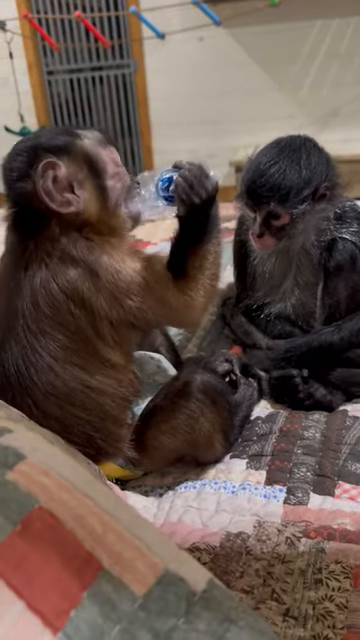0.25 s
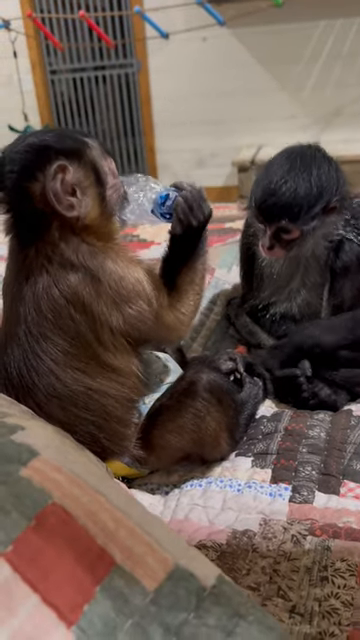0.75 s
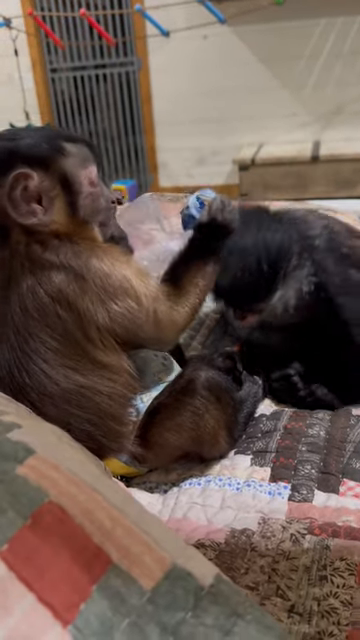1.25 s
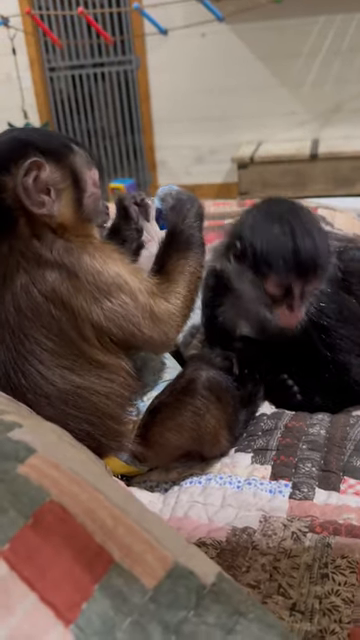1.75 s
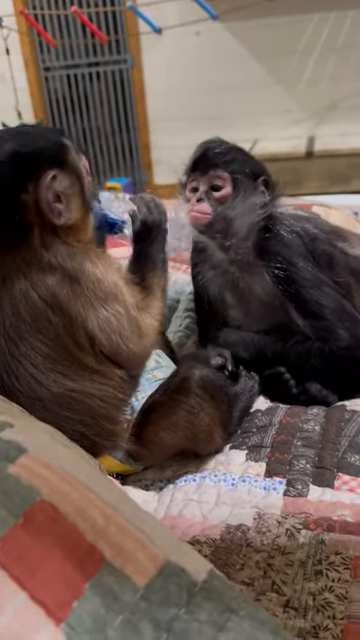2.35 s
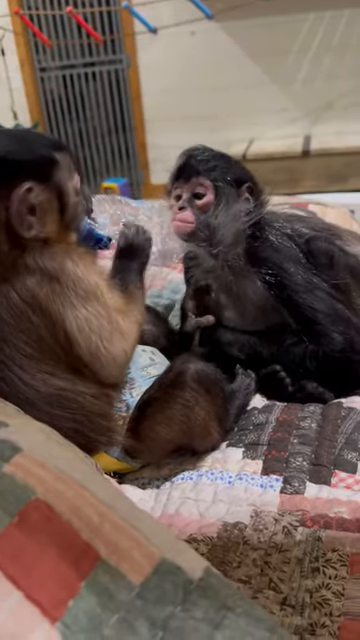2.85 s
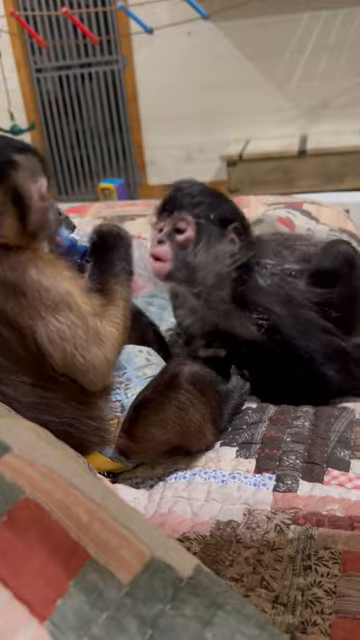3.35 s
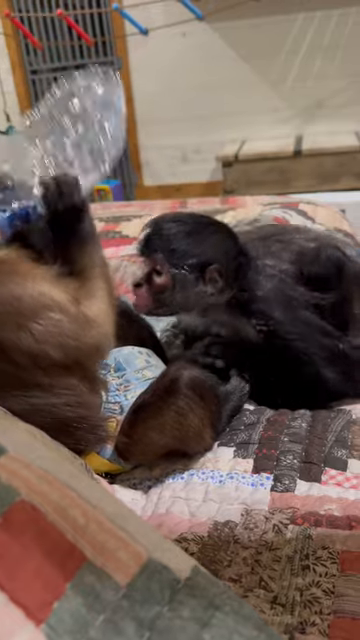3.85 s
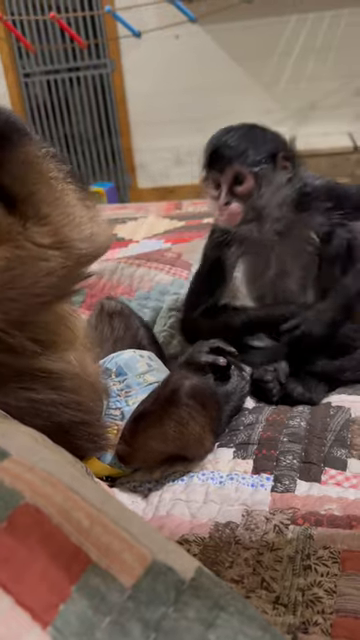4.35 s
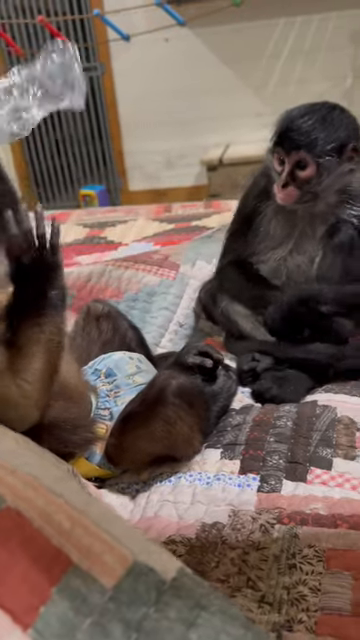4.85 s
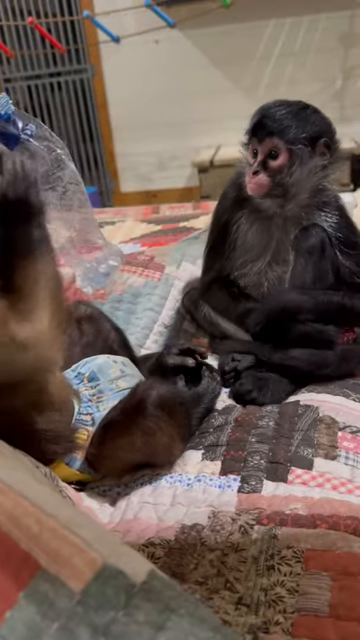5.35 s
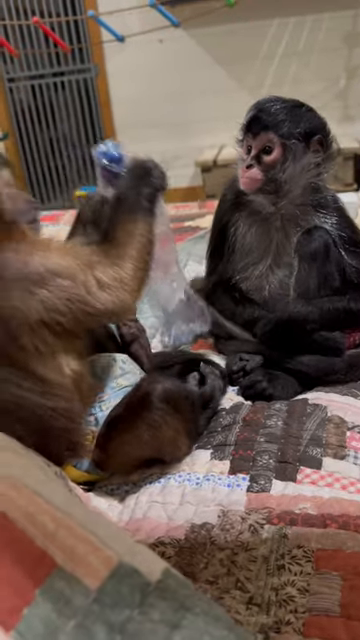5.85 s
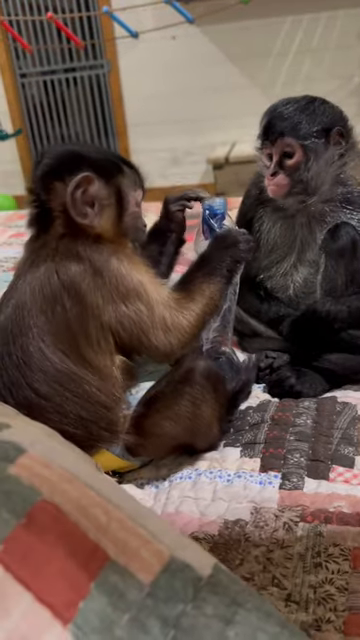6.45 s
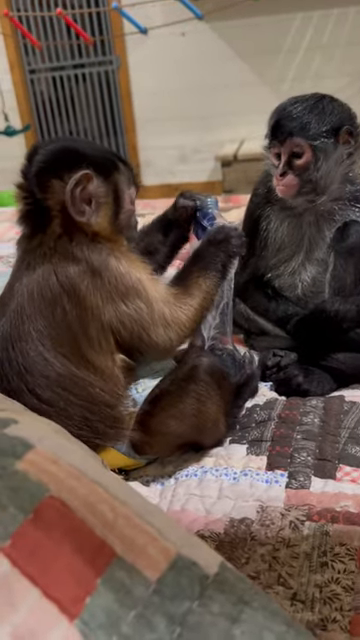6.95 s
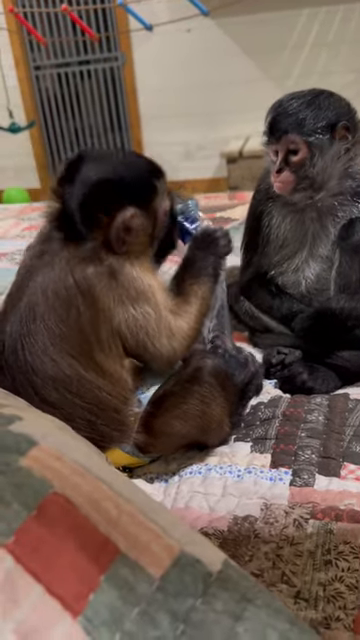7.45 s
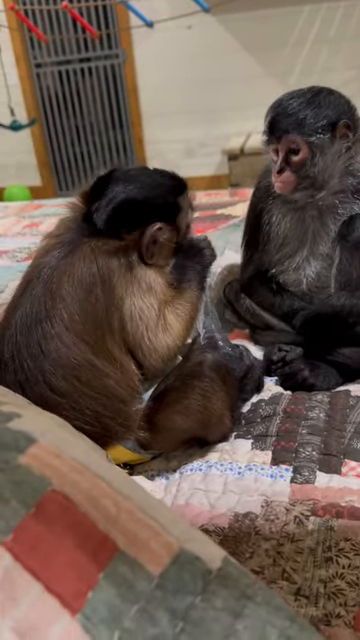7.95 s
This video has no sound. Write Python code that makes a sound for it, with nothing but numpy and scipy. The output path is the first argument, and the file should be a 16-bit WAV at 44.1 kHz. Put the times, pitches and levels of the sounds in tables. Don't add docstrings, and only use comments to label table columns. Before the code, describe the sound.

Indoor handheld capture about a metre away: irregular plastic cracks come first, loud and dry with a short bright echo. A soft paw thud on bedding follows, then scattered light crinkling and brief stick-slip creaks. Young monkeys give faint high chirps and barely audible coos. Squeezing and nail-like ticks continue quietly, then sudden crisp crunches close the scene, with faint rumbling air underneath throughout.

```python
import sys
import numpy as np
from scipy import signal
from scipy.fft import rfft, irfft, next_fast_len
from scipy.io import wavfile
from scipy.ndimage import uniform_filter1d

SR = 44100
rng = np.random.default_rng(int(sys.argv[2]) if len(sys.argv) > 2 else 0)


def dump(signal):
    limited = np.clip(np.atleast_2d(signal).T, -1, 1)
    pcm = np.round(limited * 32767).astype(np.int16)
    wavfile.write(sys.argv[1], SR, pcm)


def gain_from_db(level_db):
    decades = np.asarray(level_db, float) / 20
    return 10 ** decades


N = 361179
GRAIN = 1024

# (frequency [Hz], width [Hz], level [dB])
BELLY = [(144, 580, -2), (330, 130, 4), (550, 130, 0), (925, 130, 4.5)]
PANEL = [(1178, 190, 3), (1716, 160, 0.5), (2070, 240, 1.5), (2920, 440, -5.5)]
RIB = [(3830, 440, 1), (5220, 1400, -3), (6200, 460, 1.5), (6580, 410, -13.5)]
EDGE = [(8520, 1300, 8.5), (11200, 860, -10), (14400, 2200, -1.5), (17200, 1000, -5.5)]


def along(table, hz):
    points = np.array(table)
    return np.interp(np.log(np.maximum(hz, 1)), np.log(np.maximum(points[:, 0], 1)), points[:, 1])


def shaped(x, response):
    size = next_fast_len(x.shape[-1] + 8192)
    spectrum = rfft(x, size) * response(np.fft.rfftfreq(size, 1 / SR))
    return irfft(spectrum, size)[..., :x.shape[-1]]


def unit(x):
    return x / np.sqrt(np.mean(x ** 2))


def walk(rate):
    hold = int(SR / rate)
    steps = np.repeat(rng.standard_normal(N // hold + 1), hold)
    return 1.2 * uniform_filter1d(steps, hold)[:N]


def ring(hz, centre_hz, width_hz):
    return 1j * hz * width_hz / (centre_hz ** 2 - hz ** 2 + 1j * hz * width_hz)


def add(track, at_s, grains):
    for s, grain in zip(at_s, grains):
        i = max(int(s * SR), 0)
        track[i:i + len(grain)] += grain[:N - i]


def buckles(part_db, burst_s, after, sweep, detune, scatter_db, damping, polarity=-1):
    t, hz = np.arange(GRAIN) / SR, np.fft.rfftfreq(GRAIN, 1 / SR)
    decay = np.exp(-t / burst_s) + after * np.exp(-t / (3.1 * burst_s))
    slips = rng.standard_normal((len(part_db), GRAIN)) ** 3 * np.minimum(t / 0.00018 + 0.35, 1) * decay
    slips[:, 0] += 1.9 * np.sqrt(np.sum(slips ** 2, axis=1))
    tune = rng.standard_normal((len(part_db), 4, 4, 2))
    drive = rfft(slips) * np.exp(-2j * np.pi * sweep * np.log(1 + hz / 300))
    out = 0
    for p, modes in enumerate((BELLY, PANEL, RIB, EDGE)):
        wall = 0
        for m, (mode_hz, width_hz, db) in enumerate(modes):
            tuned_hz = mode_hz * (1 + detune * tune[:, p, m, :1])
            gain = polarity ** m * gain_from_db(db + scatter_db * tune[:, p, m, 1:])
            wall = wall + gain * ring(hz, tuned_hz, damping * width_hz)
        wall = wall * ring(hz, modes[2][0], 1.29 * modes[2][0])
        if polarity > 0:
            delay_s = .002 + .003 * np.abs(tune[:, 0, 0, :1])
            wall = np.abs(wall) * np.exp(-2j * np.pi * hz * delay_s)
        part = irfft(drive * wall)
        out = out + part * gain_from_db(part_db[:, p:p + 1]) / np.sqrt(np.sum(part ** 2, axis=1, keepdims=True))
    return out


def snaps(crease_db, burst_s, **manner):
    # (time [s], energy [dB], sharpness [dB], crease pitch [Hz])
    bites = [(.010, -21.5, 4.5, 6200), (.025, -22.5, 9, 6360), (.0651, -5.5, 6.5, 2450),
             (.2211, -6, 6.5, 2432), (.3781, -17.5, -4, 1840), (.3936, -21.5, -2, 1797),
             (.4406, -5.5, -1, 2430), (.4564, -1.5, 8.5, 6400), (.4702, 0.5, 0, 2075),
             (.4795, -12, -13, 2100), (.482, -5, -3.5, 6000), (.6904, -12, 7.5, 2346),
             (.6991, -19.5, 4.5, 6940), (.7301, -13, -6.5, 2554), (.8626, -11.5, 4, 2399),
             (.903, -0.5, -2, 2175), (.909, 1, 4, 1916), (.9322, 2, 1.5, 5600), (1.1753, -24.5, -15, 1940),
             (7.7721, -10, 6, 2200), (7.7846, -24.5, 5.5, 4000), (7.798, 1.5, 4, 5898),
             (7.8955, -17.5, -46, 1890), (7.907, -21.5, -2.5, 1480), (7.963, -25, -1, 1870),
             (8.0585, -38, 6.5, 6000), (8.0662, -19, -19, 1900), (8.1082, 5, -0.5, 1829),
             (.937, -9.5, -6.5, 1790), (.409, -32.5, 1.5, 5000), (.4572, -7, -7.5, 2200),
             (.9328, -4, -8.5, 1900), (.9235, -18, 2.5, 4200), (.0655, -12, 4.5, 5800),
             (.4706, -7, 5.5, 5900), (7.762, -35, 4.5, 3500), (8.0765, -48.5, 12, 8800),
             (7.8105, -20, 1, 5770), (7.833, -21, 4.5, 6010), (8.1086, -0.5, 4.5, 3540),
             (.2215, -8, 5.5, 6190), (7.7985, -9, 2, 2976)]
    flips = [(3.511, -44, -8.5, 2500), (4.192, -52, -3.5, 4960), (4.411, -62.5, 9.5, 6110),
             (4.9983, -49.5, -3, 4960), (6.9224, -36, 5.5, 2600), (7.2349, -49.5, 4.5, 3370),
             (7.292, -41, -8, 6180)]
    dents = [(0.228, -13, -10, 893), (1.593, -48, -3.5, 702), (1.823, -48, -8.5, 691),
             (2.5761, -31.5, -19.5, 322.6), (2.811, -28.5, -12.5, 330), (7.003, -35.5, -7, 700),
             (.229, -21, -24, 286), (3.734, -33.5, -40, 330), (3.8852, -32, -10, 598),
             (4.5523, -13.5, -27.5, 1200), (5.998, -31, -7, 540), (7.73, -35.5, -40, 493),
             (8.031, -30.5, 1, 596), (8.11, -9.5, -9, 597), (0.466, -7.5, -20, 920),
             (4.553, -17.5, -20, 471), (0.749, -33.5, -21, 697.6), (6.081, -40, -35, 1480),
             (6.129, -32.5, -29, 1450), (6.283, -30, -20.5, 586), (6.359, -28, -17, 2504),
             (8.1083, -1.5, -8, 1158), (0.913, -12.5, -10, 870), (.962, -21, -7, 790), (.977, -22, -5, 790),
             (7.801, -18, -1, 513)]
    turning = [(1.2823, -29.5, -13, 2515), (1.4017, -37.5, -4, 4420), (1.483, -44.5, -11.5, 2307),
               (1.5782, -32.5, -3, 2450), (1.921, -50, 15.5, 4380), (1.94, -28, -18, 1766),
               (2.2073, -21, -10, 2240), (2.2122, -26, -19, 1575), (2.24, -27.5, -21, 2212),
               (2.2453, -25, -16.5, 2175), (2.8089, -19.5, -13, 1120), (2.836, -27, -16, 2160),
               (2.844, -26.5, -8.5, 1950), (2.8483, -30, -17.5, 1980), (2.8689, -32.5, -7.5, 2070),
               (2.8731, -32, -11, 1680), (2.916, -32, -29, 1620), (3.023, -33.5, -7.5, 2370),
               (3.0336, -44, -7, 2340), (3.1417, -29, -8, 2330), (3.163, -29.5, -13.5, 3190),
               (3.1922, -31.5, -17, 1850), (3.2038, -32, -13, 3170), (3.259, -24.5, -8.5, 2250),
               (3.2632, -26, -12, 1560), (3.2668, -29, -21.5, 1680), (3.2758, -31.5, -10, 2890),
               (3.2849, -25.5, -16.5, 1640), (3.3, -27, -17, 1800), (3.3081, -29, -21.5, 1700),
               (3.314, -23.5, -28, 1750), (3.3179, -35, -27, 1710), (3.3228, -26, -10, 1680),
               (3.3283, -28, -28.5, 1130), (3.413, -28.5, -21.5, 1120), (3.4426, -28.5, -25, 1138),
               (3.4486, -32, -26, 1700), (3.5284, -39.5, -11.5, 1150), (3.5615, -19.5, -17, 2110),
               (3.637, -24, -15.5, 2540)]
    lifting = [(3.8131, -35, -15.5, 1116), (3.83, -32.5, -16.5, 1130), (3.91, -18.5, -11, 1920),
               (3.9308, -25.5, -9.5, 1910), (3.96, -22.5, -20, 1090), (4.07, -29.5, -23, 1140),
               (4.077, -27, -23, 1725), (4.089, -20.5, -9.5, 1770), (4.1071, -51, -6.5, 2280),
               (4.217, -35, -14.5, 1644), (4.231, -27, -20.5, 2160), (4.3285, -46.5, -15, 1970),
               (4.4869, -26.5, -16.5, 1700), (4.4959, -33.5, -9, 950), (4.5215, -34, -13, 774),
               (4.532, -26, -10, 2270), (4.5568, -27.5, 1.5, 734), (4.7213, -33, -3.5, 1700),
               (4.8045, -39.5, -6, 1720), (5.38, -48, -13, 2110), (5.3997, -44, -15.5, 2925),
               (5.5234, -40.5, -15, 2170), (5.5252, -35, -29, 950)]
    squeezing = [(5.9072, -31, 1.5, 2630), (5.9669, -28, -7.5, 1800), (6.0165, -25, 0, 1130),
                 (6.0328, -24.5, -10, 1050), (6.2087, -20, -11.5, 1140), (6.255, -27.5, -27.5, 1145),
                 (6.291, -29, -12.5, 1254), (6.3537, -24, -9.5, 1860), (6.376, -29.5, -20, 1220),
                 (6.387, -35, -9, 3140), (6.4706, -37.5, -17.5, 1340), (6.4775, -41, -18, 1940),
                 (6.56, -42.5, -18, 1850), (6.585, -39.5, -9.5, 1770), (6.5923, -33, -32.5, 1240),
                 (6.6104, -34, -11, 2200), (6.665, -30.5, -12, 1980), (6.71, -28, -5, 2020),
                 (6.8094, -28.5, 1, 1980), (6.8183, -36, 8, 6660), (6.824, -34.5, 3.5, 1870),
                 (6.84, -37.5, 5.5, 4050), (6.859, -42.5, 3.5, 3080), (6.8903, -29, -0.5, 2170),
                 (6.906, -34.5, -2, 2136), (6.9998, -35.5, -8, 3600), (7.1577, -49, -7, 2670),
                 (7.4201, -33, -9, 1840), (7.448, -30.5, -11.5, 1850), (7.4564, -31.5, -15, 1846),
                 (7.461, -33.5, -11.5, 1800), (7.4668, -44.5, -16, 1820), (7.4694, -36.5, -20, 804),
                 (7.4757, -37, -11, 1920), (7.4804, -34.5, -13.5, 1077), (7.5026, -37, -15.5, 1760),
                 (7.5107, -35, -22.5, 1040), (7.516, -31, -19, 1810), (7.5546, -31.5, -7, 2000),
                 (7.561, -32.5, -1, 1770), (7.5785, -31.5, -1.5, 1160), (7.5905, -27, -10, 1960),
                 (7.5943, -27.5, -18, 1940), (7.742, -31.5, -19.5, 1120)]
    ticking = [(1.3298, -41, -2.5, 2255), (1.5553, -36, -1, 2280), (1.7023, -45.5, 8, 3740),
               (1.8564, -41.5, 0, 6130), (2.4319, -47, 0, 3263), (6.5877, -41, 0.5, 7900),
               (6.6016, -36, -3, 5300), (6.6228, -27, -1.5, 6520), (6.631, -34.5, -1, 5200),
               (6.6389, -24, -1.5, 3080), (6.6874, -42, 2, 6780), (6.744, -45.5, 3.5, 5770),
               (6.7655, -40, 5.5, 6760), (6.7792, -31, 5.5, 7900), (6.7931, -28, 9.5, 6860),
               (6.799, -25, -4.5, 7770), (6.9159, -33.5, 2, 2520), (7.0347, -39, -2.5, 5750),
               (7.0978, -42.5, 0, 2390), (7.228, -56.5, -6.5, 1567)]
    # (belly [dB], panel [dB], rib [dB], edge [dB])
    share_db = [(-14, 0.0035, 0, -2.5), (-12, 0.0038, 5, 7), (-2, 0.0044, 2, -2), (-11, 0.0039, -0.5, -9.5),
                (-7.5, 0.001, 2.5, 2), (-4, 0.03, -2, -0.5), (-8, 0.0085, -1, 4)]
    stands_out_db = (6, 18, 11, 4, 4, 4, 7)
    # (belly [dB/dB], panel [dB/dB], rib [dB/dB], edge [dB/dB])
    sharpness_gain = (-0.15, 0.064, 0.88, 1.3)

    kinds = bites, flips, dents, turning, lifting, squeezing, ticking
    rows, counts = np.vstack(kinds), [len(k) for k in kinds]
    sharp_db, crease_hz = rows[:, 2:3], rows[:, 3:]
    part_db = rows[:, 1:2] + np.repeat(share_db, counts, axis=0) + sharp_db * np.array(sharpness_gain)
    lasting_s = burst_s * gain_from_db(-0.1 * np.clip(sharp_db, -15, 15))
    wall = buckles(part_db, lasting_s, **manner)
    boost = gain_from_db(crease_db + np.repeat(stands_out_db, counts))[:, None]
    crease = ring(np.fft.rfftfreq(GRAIN, 1 / SR), crease_hz, 0.3 * crease_hz)
    rung = irfft(rfft(wall) * (1 + boost * crease))
    same_energy = np.sqrt(np.sum(wall ** 2, axis=1) / np.sum(rung ** 2, axis=1))
    track = np.zeros(N)
    add(track, rows[:, 0], rung * same_energy[:, None])
    return track


def creaks():
    # (time [s], length [s], slip rate [1/s], crease pitch [Hz], level [dB])
    trains = [(0.372, .04, 260, 1570, -42), (2.818, .03, 560, 700, -63.5), (2.853, 0.044, 320, 1630, -52),
              (3.113, .028, 500, 1474, -55.5), (3.291, .045, 470, 2720, -64.5),
              (5.522, .03, 300, 1096, -59), (5.584, .092, 500, 1474, -71.5),
              (6.555, 0.055, 760, 1400, -57.5), (6.652, .044, 660, 1980, -85),
              (7.546, .046, 900, 1500, -61.5), (7.613, 0.028, 410, 1246, -44.5),
              (7.652, 0.026, 400, 1210, -50.5), (7.663, .011, 420, 2100, -54),
              (7.677, .014, 400, 1250, -57.5), (7.961, 0.026, 300, 1950, -48.5),
              (8.03, .031, 400, 1300, -46.5)]
    track, hz = np.zeros(N), np.fft.rfftfreq(GRAIN, 1 / SR)
    unevenness = np.where(np.array(trains)[:, 2] > 430, .45, .07)
    part_db = np.array([-8.5, -4.0, -16, -39.5]) + unevenness[:, None] * np.array([-1.0, 0.0, 7, 34])
    creases = buckles(part_db, .00008, after=0, sweep=0.88, detune=0.056, scatter_db=0.86, damping=1.2)
    for (s, length, rate, crease_hz, db), uneven, crease in zip(trains, unevenness, creases):
        chance = rng.standard_normal((80, 2))
        at = np.cumsum(np.exp(uneven * chance[:, 0]) / rate) - 1 / rate
        keep = at < length
        peak = ring(hz, crease_hz, (0.33 + 0.46 * uneven) * crease_hz)
        second_peak = 1.3 * ring(hz, 1.7 * crease_hz, 0.4 * crease_hz)
        tuned = irfft(rfft(crease) * (0.62 * uneven + 0.5 + peak - second_peak))
        add(track, s + at[keep], gain_from_db(db + 21 + 7.0 * uneven * chance[keep, 1:]) * tuned)
    return track


def rustle():
    # (time [s], effort [dB])
    efforts = [(0.0, -44), (0.092, -50), (0.981, -49), (1.39, -62), (2.03, -77.5), (2.779, -69),
               (3.17, -61), (5.36, -81), (5.91, -70.5), (6.16, -57.5), (6.41, -88.5), (6.59, -61),
               (6.77, -60.5), (7.21, -75.5), (7.46, -92), (7.639, -76), (8.01, -53.5), (8.19, -64)]
    s, effort_db = np.transpose(efforts)
    bright_db = effort_db - 9.5 + 0.75 * (effort_db + 52)
    levels = effort_db, effort_db, bright_db
    out = 0
    for modes, level_db, trim_db in zip((BELLY[2:], PANEL, RIB), levels, (-15, -8, -7)):
        hits = rng.random(N) < 5000 / SR
        size = gain_from_db(2.7 * np.minimum(rng.exponential(size=N), 5))
        ticks = hits * rng.standard_normal(N) * size
        body = shaped(ticks, lambda hz: sum(gain_from_db(db) * ring(hz, f, 2.5 * w) for f, w, db in modes))
        effort = np.interp(np.arange(N) / SR, s, level_db)
        out = out + unit(body) * gain_from_db(effort + trim_db + 2.5 * walk(40))
    return out


def shivers():
    # (time [s], rise [s], T60 [s], facet pitch [Hz], level [dB])
    facets = [(.001, .001, .05, 420, -37), (.125, .02, 0.087, 2060, -42),
              (0.796, 0.028, 0.068, 2500, -45.5), (.955, .012, .2, 950, -42), (2.579, 0.0055, .1, 330, -60),
              (2.585, .01, 0.17, 902, -68.5), (2.815, 0.0044, 0.11, 330, -54.5),
              (4.565, .01, 0.73, 1140, -60)]
    track, t, hz = np.zeros(N), np.arange(SR // 2) / SR, np.fft.rfftfreq(SR // 2, 1 / SR)
    for s, rise, t60, facet_hz, db in facets:
        facet = ring(hz, facet_hz, 0.3 * facet_hz) ** 2
        flutter = irfft(rfft(rng.standard_normal(len(t))) * facet)
        fade = gain_from_db(db - 60 * np.maximum(t - rise, 0) / t60)
        add(track, [s], [unit(flutter) * np.minimum(t / rise, 1) * fade])
    return track


def arc(rows, fall, bend, ends_db, octave_db, octave_ends_db):
    u, notes = np.linspace(0, 1, num=9), []
    for s, length, hz, db, top in rows:
        away = np.where(u < top, (top - u) / max(top, 1e-9), (u - top) / (1 - top))
        off = np.abs(2 * u - 1)
        pitch_hz = hz * (1 - fall * away ** bend)
        level_db = db + ends_db * away ** 2
        notes.append(np.transpose([s + length * u, pitch_hz, level_db, db + octave_db + octave_ends_db * off]))
    return notes


def voice(notes, edge_s, wobble, half_db):
    track, tremor = np.zeros(N), walk(65)
    for note, sub_db in zip(notes, half_db):
        s, *columns = np.transpose(note)
        i = int(s[0] * SR)
        t = s[0] + np.arange(int((s[-1] - s[0]) * SR)) / SR
        hz, db, octave_db = (np.interp(t, s, c) for c in columns)
        turn = 2 * np.pi * np.cumsum(hz * (1 + wobble * tremor[i:i + len(t)])) / SR
        alternating = gain_from_db(sub_db) * (2 * np.sin(turn / 2) + np.sin(3 * turn / 2))
        tone = gain_from_db(db) * (np.sin(turn) + alternating) + gain_from_db(octave_db) * np.sin(2 * turn)
        edge = np.clip(np.minimum(t - s[0], s[-1] - t) / edge_s, 0, 1)
        add(track, s[:1], [np.sqrt(2) * tone * edge])
    return track


def calls():
    # (time [s], length [s], top pitch [Hz], level [dB], share of the call spent rising [0-1])
    chirps = [(3.047, 0.038, 3140, -49.5, 0.58), (3.122, 0.0208, 3300, -45, 0.11),
              (3.205, 0.027, 3050, -45.5, 0.015), (5.977, 0.016, 3600, -45, 0.012),
              (6.098, 0.0223, 3670, -37.5, 0.02), (6.195, 0.012, 3310, -41.5, 0.0077)]
    peep = [(4.405, 0.026, 6220, -66, 0.0078)]
    coos = [(1.46, 0.3, 608, -71, 0.51), (3.14, 0.12, 815, -68, 0.25), (3.36, 0.15, 780, -67, 0.222)]
    half_pitch_db = (-50, -50, -24, -50, -50, -50, -50)
    high = arc(chirps, 0.154, 1.8, -2.6, -12.5, -12.5) + arc(peep, 0.042, 0.62, -10, -44.5, 0)
    low = arc(coos, .13, 1.3, -5, -14, 0)
    return voice(high, 0.0013, 0.0021, half_pitch_db) + voice(low, .02, .05, half_pitch_db[3:])


def thud():
    # (time [s], frequency [Hz], width [Hz], peak [dB])
    paw = (1.137, 270, 130, -45)
    s, hz, width_hz, db = paw
    t = np.arange(N) / SR - s
    push = rng.standard_normal(N) * np.exp(-(t / 0.015) ** 2)
    blow = shaped(push, lambda f: ring(f, hz, width_hz) * ring(f, hz, 7.3 * width_hz))
    return gain_from_db(db) * blow / np.abs(blow).max()


def sniff():
    # (start [s], end [s], level [dB])
    breath = (5.72, 5.855, -69)
    # (frequency [Hz], width [Hz], level [dB])
    nose = [(2240, 630, -3), (3810, 780, -0.5), (5630, 480, -1.5)]
    start, end, db = breath
    u = np.clip((np.arange(N) / SR - start) / (end - start), 0, 1)
    hiss = shaped(rng.standard_normal(N), lambda hz: sum(gain_from_db(g) * ring(hz, f, w) ** 2 for f, w, g in nose))
    return gain_from_db(db) * unit(hiss) * np.sqrt(np.sin(np.pi * u ** 2.5))


def ports(near):
    # (frequency [Hz], phase [rad])
    lead = [(100, 0), (430, 0), (1030, .3), (2410, .1), (2930, .6), (4820, .6), (5430, -.3), (8610, -2),
            (11800, -2.4), (12600, -3.8), (16300, -4.1)]
    # (frequency [Hz], level [dB])
    difference_db = [(200, 5), (400, -1.5), (700, -3), (1300, 1), (5000, 0)]
    sign = np.array([[1], [-1]])

    def response(hz):
        level = gain_from_db(sign * along(difference_db, hz) / 2)
        lag = np.exp(.5j * sign * along(lead, hz))
        return level * lag / (1 + (hz / 16800) ** 60)

    return shaped(near, response)


def spread(mid, other, left_db):
    # (frequency [Hz], level [dB])
    side_db = [(60, -15.5), (200, -7), (700, 3.5), (1290, -5), (2380, -4.5), (4400, -2), (8120, -3.5),
               (16000, 5.5)]

    def mid_response(hz):
        kept = gain_from_db(left_db) + (1 - gain_from_db(left_db)) / (1 + (hz / 9100) ** 40)
        back = gain_from_db(-14.5) * hz ** 8 / (hz ** 8 + 13800. ** 8)
        return kept + back * (hz > 13800) * (hz < 15900)

    side = shaped(other, lambda hz: gain_from_db(along(side_db, hz)))
    mid = shaped(mid, mid_response)
    return np.array([mid + side, mid - side])


def room(x):
    # (frequency [Hz], T60 [s])
    decay_s = [(250, 0.61), (700, 0.11), (1500, 0.3), (3500, 0.7), (7000, 0.51), (9500, 0.52),
               (12000, 0.13)]
    # (frequency [Hz], level [dB])
    colour_db = [(200, -39.5), (700, -36), (2000, -42), (4000, -43), (8000, -45.5), (15000, -30.5)]
    # (how long ago [s], level [dB], crease pitch [Hz])
    earlier = (0.027, 8, 6100)
    t = np.arange(int(.9 * SR)) / SR
    noise, tail = rng.standard_normal((2, len(t))), 0
    for hz in 125 * 2. ** np.arange(8):
        def band(f):
            return np.cos(np.pi / 2 * np.clip(np.log2(np.maximum(f, 1) / hz), -1, 1)) ** 2
        tail = tail + shaped(noise, band) * gain_from_db(along(colour_db, hz) - 60 * t / along(decay_s, hz))
    tail = tail * np.clip((t - .006) / 0.0036, 0, 1)
    tail = tail * gain_from_db(4 * walk(500)[:len(t)] * np.exp(-t / .04))
    wet = signal.fftconvolve(x[None], tail, axes=1)[:, :N]
    ago_s, db, crease_hz = earlier
    lingering = shaped(tail, lambda f: 1.1 * ring(f, 3000, 6000) + ring(f, crease_hz, 0.9 * crease_hz))
    lingering = lingering[:, int(ago_s * SR):]
    wet[:, :lingering.shape[1]] += gain_from_db(db) * lingering
    return spread(*wet, left_db=-46)


def machine():
    # (frequency [Hz], level [dB])
    hum = [(59.4, -78), (90.5, -70), (120, -67.5), (178.2, -82), (240, -80.5), (297, -84.5), (356, -74)]
    # (frequency [Hz], density [dB per Hz])
    air_colour = [(18, -45.5), (30, -15), (125, -8.5), (206, -27.5), (229, -13), (323, -26.5), (359, -13),
                  (388, -36.5), (443, -31.5), (904, -38.5), (5300, -45), (10300, -58.5), (15200, -46),
                  (16500, -54)]
    t = np.arange(N) / SR
    lines = 0
    for hz, db in hum:
        lines = lines + gain_from_db(db + 6.0 + 2.3 * walk(23)) * np.sin(2 * np.pi * hz * t + .3 * walk(12.0))
    air = shaped(rng.standard_normal((2, N)), lambda hz: gain_from_db(along(air_colour, hz)))
    air = air * gain_from_db(-67.5) / np.sqrt(np.mean(air[0] ** 2))
    return spread(*air, left_db=-12.0) + lines


def scene():
    rest = creaks() + rustle() + shivers() + calls() + thud() + sniff()
    direct = snaps(0, 0.0014, after=0.41, sweep=1.2, detune=0.082, scatter_db=4.4, damping=1.3)
    blurred = snaps(-9, .00003, after=0, sweep=0, detune=.02, scatter_db=1, damping=3.5, polarity=1)
    return ports(direct + rest) + room(blurred + rest) + machine()


def top_cut(x):
    return signal.sosfilt(signal.butter(12, 17030, fs=SR, output="sos"), x)


def record(dry):
    mix = np.tanh(dry)
    return top_cut(mix)


dry = scene()
out = record(dry)
dump(out)
```